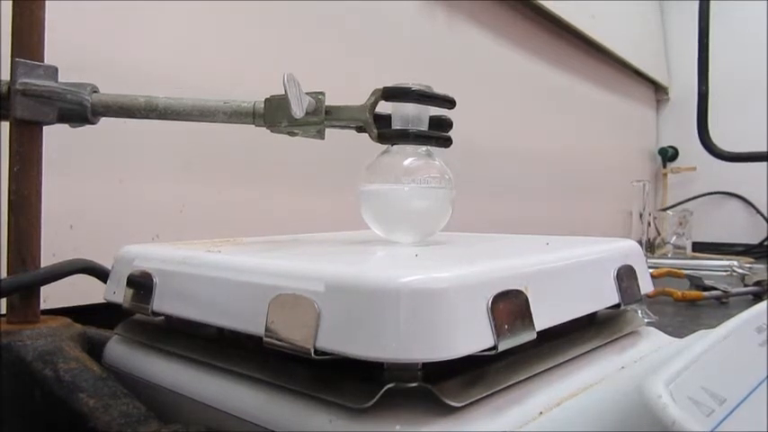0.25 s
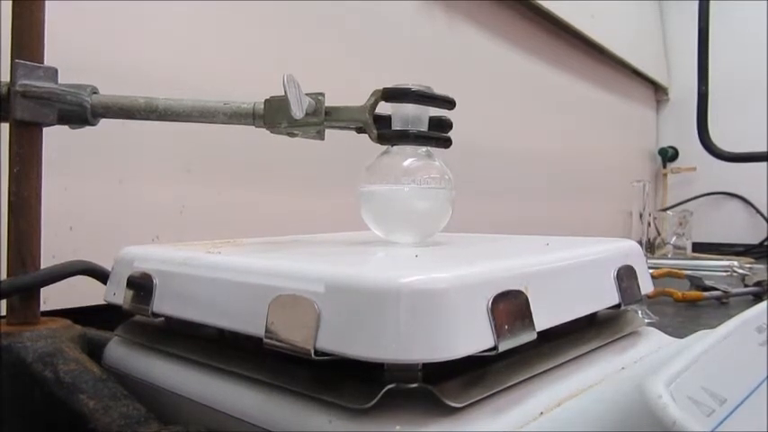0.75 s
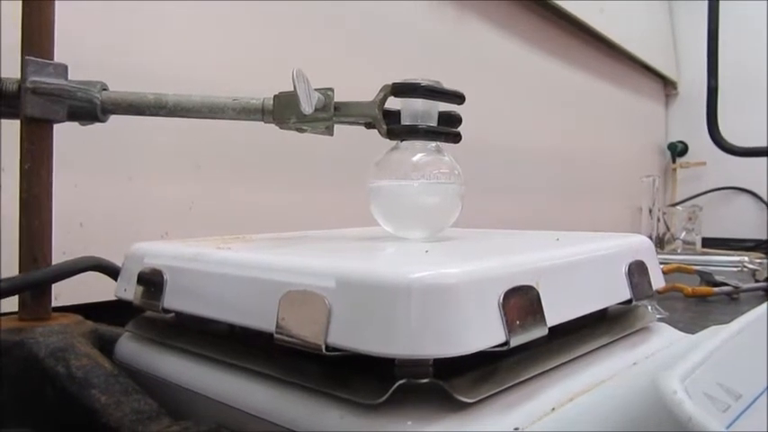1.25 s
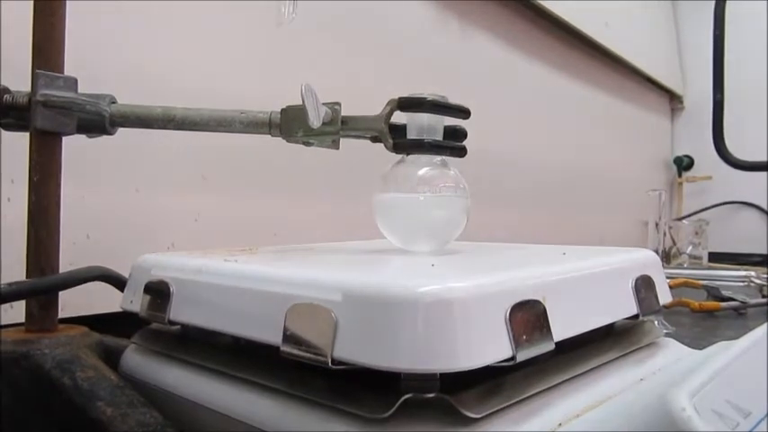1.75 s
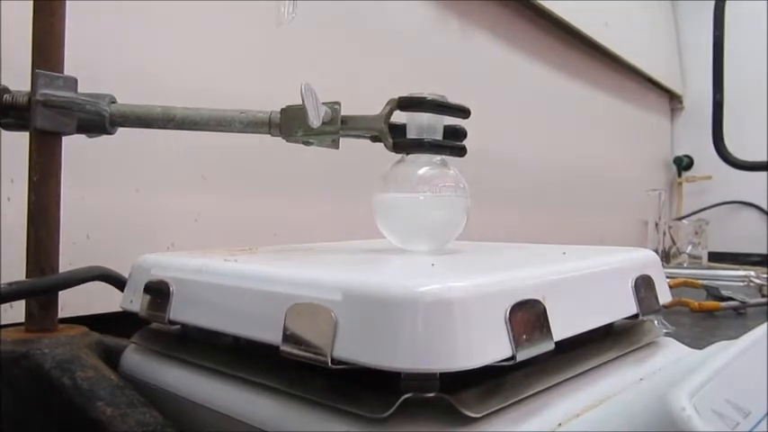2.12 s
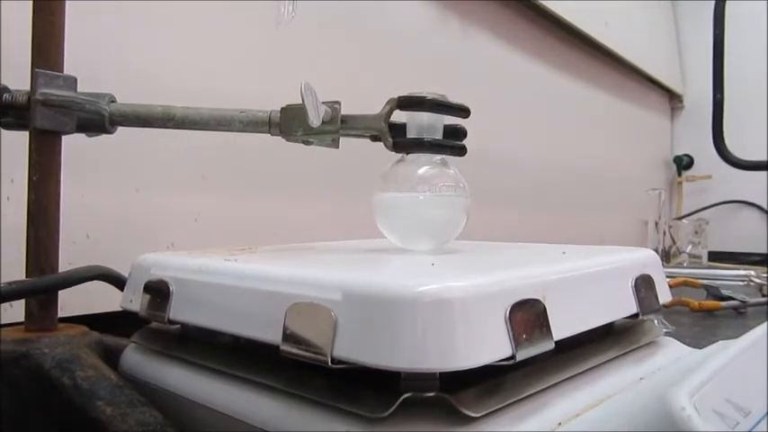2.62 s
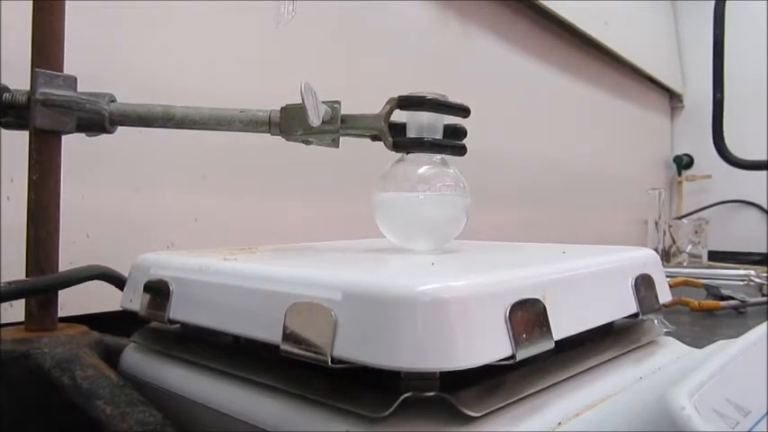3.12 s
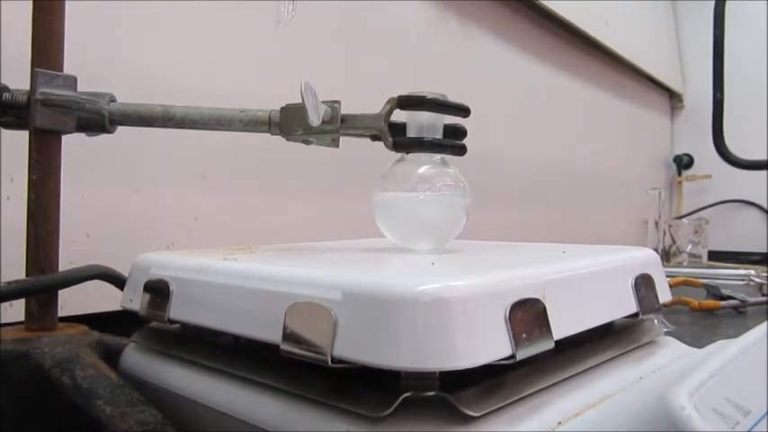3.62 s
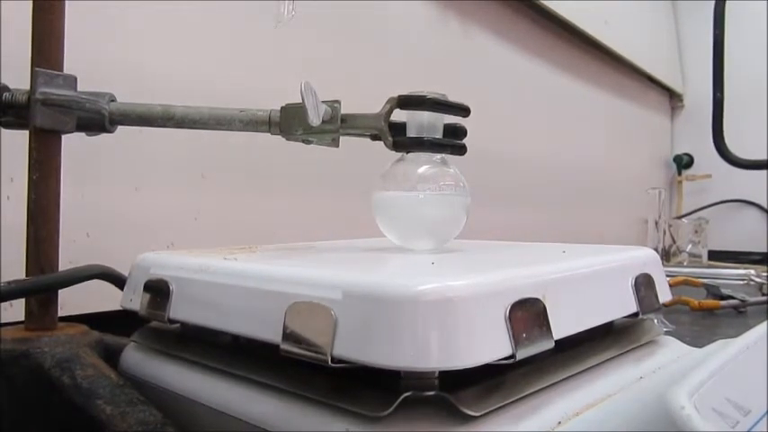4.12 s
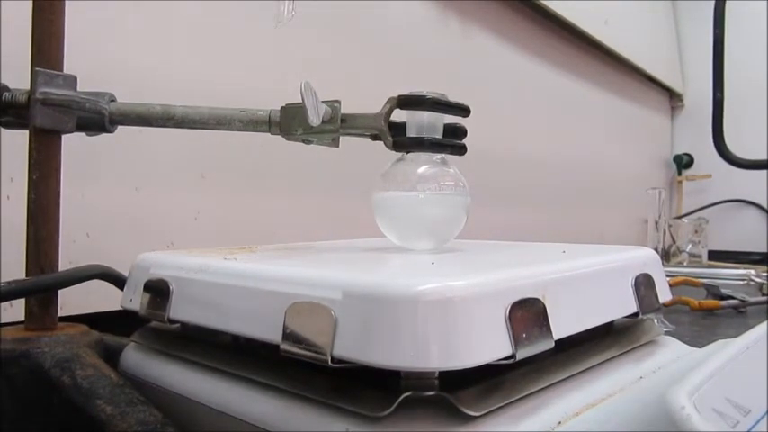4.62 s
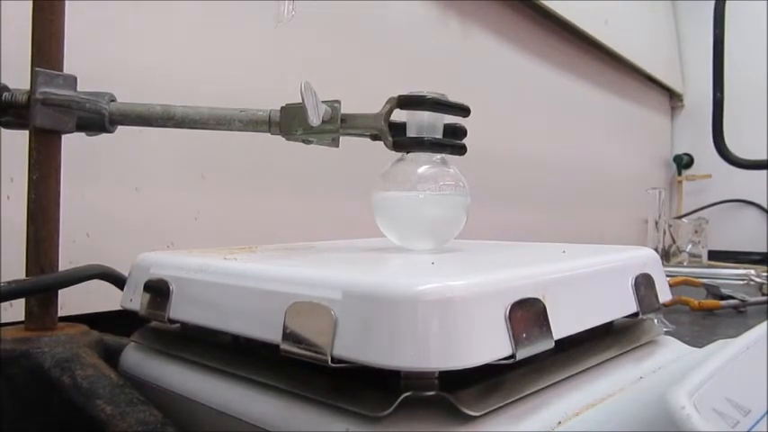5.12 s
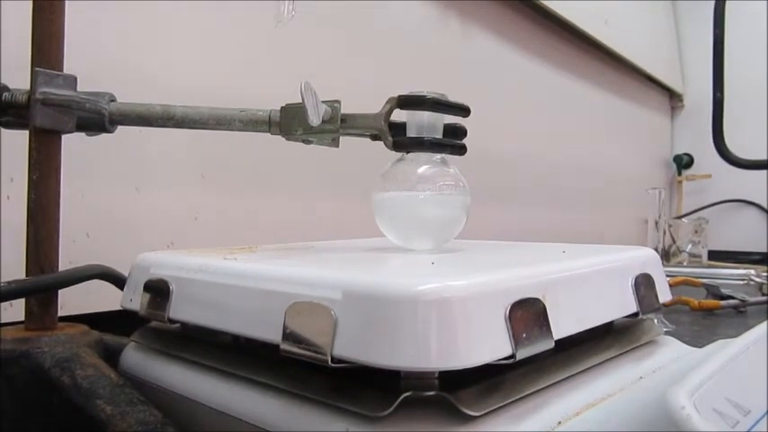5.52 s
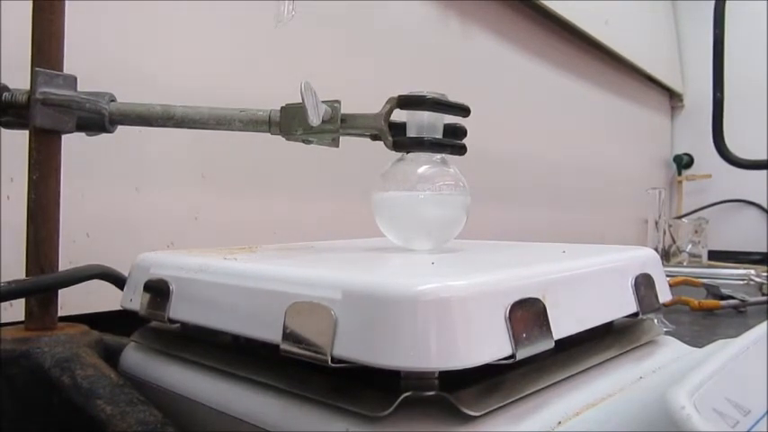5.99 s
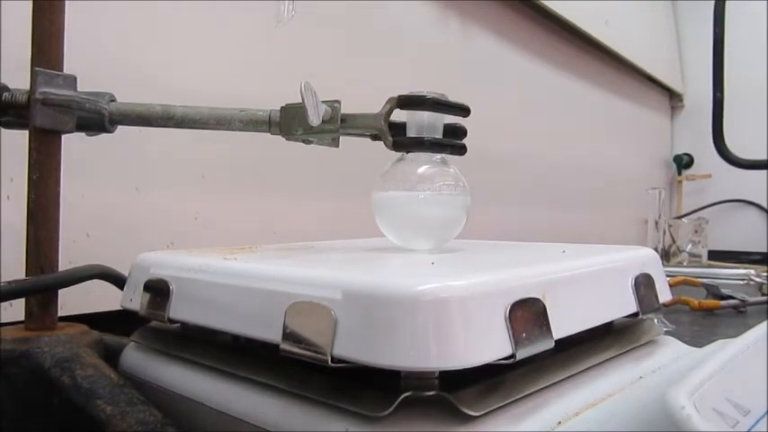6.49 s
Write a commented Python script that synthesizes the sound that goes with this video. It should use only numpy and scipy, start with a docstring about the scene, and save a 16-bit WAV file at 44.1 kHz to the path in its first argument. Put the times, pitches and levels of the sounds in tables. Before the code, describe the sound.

Ventilation runs steadily in a chemistry lab, heard close up from one microphone inside a fume hood. A deep throbbing hum and a low two-note drone sit under a hollow rush and hiss of air, with thin fan tones showing through. Early on there is one faint, bright tick, and the sound cuts abruptly to silence for a moment. It returns a little softer, quickly recovers and carries on.

```python
"""Fume hood ventilation in a chemistry lab, close up, with one microphone inside the hood.
Turbulent air rings the duct and the hood's cavity: a deep throbbing hum, a two-note drone, a boom,
a hollow rush and a hiss. Thin fan tones show through, over a low rumble, and there is one faint tick.
The sound cuts to silence for a moment, then comes back a little softer and recovers."""
import sys
import numpy as np
from scipy import signal
from scipy.fft import rfft, irfft
from scipy.io import wavfile
from scipy.ndimage import uniform_filter1d

SR = 44100
rng = np.random.default_rng(int(sys.argv[2]) if len(sys.argv) > 2 else 0)


def store_pcm(level_fs):
    """Save levels as 16-bit WAV."""
    pcm = np.round(np.clip(level_fs, -1, 1) * 32767).astype(np.int16)
    wavfile.write(sys.argv[1], SR, np.atleast_2d(pcm).T)


N = 297675
# where each band of the moving air ends and the next begins
RUMBLE_TOP_HZ, HUM_TOP_HZ, DRONE_SPLIT_HZ, DRONE_TOP_HZ = 48, 95, 151, 210
BOOM_TOP_HZ, LOW_RUSH_TOP_HZ, MID_RUSH_TOP_HZ = 360, 520, 730


# spectrum of the air stream before any resonance: frequency_hz, relative_db
STREAM_SPECTRUM = [(15, -4), (27, -4.5), (36, 9.5), (205, -9.5), (520, -3.5), (1240, -7), (1650, -6.5),
                   (2250, -13), (3100, -16.5), (5100, -18), (5600, -22.5), (6700, -24.5), (7800, -24),
                   (9600, -33), (15000, -43)]
# resonances of duct and hood: pitch_hz, width_hz, lift_db
RESONANCES = [(61.9, 8.4, 18), (106, 20.5, 12.5), (132, 43, 18), (142.1, 7.4, 17), (164.3, 31, 12),
              (180.9, 24, 20), (226.5, 18.6, 14.5), (248.4, 53, 9), (291.4, 29, 9), (322, 17, 10),
              (344, 31, 8), (378, 10, 6), (404.6, 26, 9), (451, 19, 7), (563.8, 26, 8.5), (592, 52, 7.5),
              (645, 17.5, 8.5), (676, 42, 5), (763.4, 52, 5), (884, 20, 5.5), (924, 33, 4.5),
              (987, 56, 4.5), (1043, 29, 6), (1124, 50, 5.5), (1340, 22, 6.5), (1380, 50, 2),
              (1492, 32, 4.5), (1563, 21, 2), (1641, 73, 2.5), (1773, 36, 2), (1942, 24, 6.5),
              (2000, 67, -1.5), (2097, 46, 5.5), (2400, 34, 0)]
# hollows where reflections off the walls cancel at the microphone: centre_hz, width_hz, gain_db
WALL_HOLLOWS = [(211, 18, -6.5), (278.5, 10, -6.5), (357, 15, -3.5), (465, 8.8, -11), (523, 6.9, -11.5),
                (535, 10.4, -7), (784, 23, -5), (945, 8, -5), (1085, 22, 0), (1190, 14, -8),
                (1250, 29, -4.5), (1785, 45, -0.5), (2253, 63, -2)]

def hood_colour(hz):
    """Spectrum inside the hood: the stream, lifted by resonances and hollowed by reflections."""
    points_hz, points_db = np.transpose(STREAM_SPECTRUM)
    stream = gain_of(np.interp(np.log(hz + 1), np.log(points_hz), points_db))
    lift = sum((gain_of(db) / (1 + (2 * (hz - centre) / width) ** 2)) ** 2
               for centre, width, db in RESONANCES)
    hollow_db = sum(db * np.exp(-(2 * (hz - centre) / width) ** 2) for centre, width, db in WALL_HOLLOWS)
    return stream * np.sqrt(1 + lift) * gain_of(hollow_db)


def airflow(low_hz, high_hz, ripple_db=0, crowded_hz=1500):
    """One band of turbulence through the hood; small modes crowd upwards and can ripple its spectrum."""
    hz = np.fft.rfftfreq(N, 1 / SR)
    band = (hz >= low_hz) & (hz < high_hz)
    ripple = gain_of(ripple_db * np.minimum(hz / crowded_hz, 1) * wander(len(hz), size=70))
    turbulence = rfft(rng.standard_normal(N))
    return unit_rms(irfft(turbulence * band * hood_colour(hz) * ripple, N))


# slow level of the hum between throbs: time_s, relative_db
HUM_LEVEL = [(0, -33), (0.72, -35), (0.84, -38), (0.98, -31.5), (1.7, -32), (2.95, -32.5), (3.22, -39),
             (3.4, -31.5), (4.5, -34), (4.59, -46), (4.8, -32.5), (5.78, -36.5), (5.9, -46), (6.02, -31),
             (6.25, -36), (6.55, -29.5), (6.75, -34)]
# its strongest throbs: peak_s, length_s, lift_db
HUM_THROBS = [(0.068, 0.06, 4), (0.63, 0.1, 6), (1.11, 0.098, 8.5), (1.332, 0.14, 8), (1.81, 0.063, 9.5),
              (1.923, 0.08, 7), (2.4, 0.11, 8), (2.88, 0.16, 2), (3.37, 0.074, 3), (3.80, 0.23, 4),
              (4.16, 0.08, 5), (4.473, 0.12, 6), (4.842, 0.16, 3), (5.263, 0.079, 6.5), (5.474, 0.096, 9),
              (5.76, 0.11, 9), (6.365, 0.088, 6.5)]

def hum(gain_db=1.84, unsteady_db=1.0, pitch_hz=62.5, drift_hz=3.47, core_db=-4):
    """The lowest duct resonance: a wavering tone in narrow noise, swelling and firming up in throbs."""
    throbs_db = sum(db * throb(at, length) for at, length, db in HUM_THROBS)
    swell_db = curve(HUM_LEVEL) + throbs_db + unsteady_db * wander(N, size=2000)
    core = gain_of(core_db + throbs_db) * tone(pitch_hz, drift_hz, size=5000)
    air = airflow(RUMBLE_TOP_HZ, HUM_TOP_HZ) + core
    return gain_of(gain_db) * surging(air, swell_db, size=3500)


# slow levels of the drone's two notes between throbs: time_s, level_db
LOWER_NOTE_LEVEL = [(0, -36), (0.3, -30.5), (0.85, -30.5), (1.22, -30.5), (1.37, -37.5), (1.8, -30.5),
                    (2.1, -33.5), (2.35, -30), (2.8, -29.5), (3.25, -37.5), (3.45, -32), (3.8, -33.5),
                    (4.65, -28), (4.85, -36), (5.1, -32), (6.75, -33)]
UPPER_NOTE_LEVEL = [(0, -33), (0.42, -34), (0.6, -29), (1.37, -34), (2.1, -31.5), (2.7, -28.5), (3.22, -35),
                    (3.55, -30), (3.9, -29.5), (4.5, -34.5), (5.4, -33), (5.8, -31.5), (6.4, -32),
                    (6.75, -30)]
# their strongest throbs: peak_s, length_s, lower_lift_db, upper_lift_db
NOTE_THROBS = [(0.121, 0.13, 7, 7), (0.271, 0.073, 4, 7), (0.397, 0.063, 5, 0), (1.04, 0.065, 5.5, 4.5),
               (2.227, 0.057, 6, 5), (2.456, 0.053, 3, 0.5), (2.64, 0.13, 1.5, 2.5), (2.952, 0.06, 3, 3.5),
               (3.574, 0.20, 9, -1.5), (3.728, 0.083, 3, 4.5), (4.038, 0.10, 0, 2.5),
               (4.763, 0.066, -2.5, 8), (6.598, 0.099, -1, 5.5)]

def drone(lower_hz=129.9, upper_hz=166.9):
    """The next two duct resonances; they swell apart, throb, and beat roughly against each other."""
    lower_db = curve(LOWER_NOTE_LEVEL) + sum(db * throb(at, length) for at, length, db, _ in NOTE_THROBS)
    upper_db = curve(UPPER_NOTE_LEVEL) + sum(db * throb(at, length) for at, length, _, db in NOTE_THROBS)
    lower = drone_note(HUM_TOP_HZ, DRONE_SPLIT_HZ, lower_hz, lower_db, core_db=-2.5)
    upper = drone_note(DRONE_SPLIT_HZ, DRONE_TOP_HZ, upper_hz, upper_db, core_db=-4.5)
    return lower + upper


def drone_note(low_hz, high_hz, pitch_hz, swell_db, core_db, drift_hz=2.185):
    """One duct resonance: narrow noise that firms up into a tone the more it swells."""
    core = gain_of(core_db + swell_db - swell_db.mean()) * tone(pitch_hz, drift_hz, size=7000)
    return surging(airflow(low_hz, high_hz) + core, swell_db, size=4800)


# slow levels of the rush's low, middle and high bands: time_s, level_db
LOW_RUSH_LEVEL = [(0, -37.5), (1.2, -37.5), (2, -39), (2.35, -36), (3.25, -39.5), (3.8, -36), (5, -35.5),
                  (6.75, -35.5)]
MID_RUSH_LEVEL = [(0, -35.5), (0.5, -31.8), (1.1, -33.8), (2, -33.5), (2.3, -31), (2.55, -35), (3, -32.7),
                  (3.3, -33.5), (4.8, -34), (5.6, -32.2), (6.75, -32)]
HIGH_RUSH_LEVEL = [(0, -28), (0.7, -28), (1.3, -28), (2, -27.5), (2.35, -27.5), (3.15, -28.5), (3.65, -28),
                   (4.4, -28), (5.2, -28), (6, -28.4), (6.75, -28)]

def rush(flutter_db=0.41):
    """Hollow rush and slightly fluttering hiss of air drawn through the hood, past the microphone."""
    low = surging(airflow(BOOM_TOP_HZ, LOW_RUSH_TOP_HZ), curve(LOW_RUSH_LEVEL), size=14000)
    middle = surging(airflow(LOW_RUSH_TOP_HZ, MID_RUSH_TOP_HZ), curve(MID_RUSH_LEVEL), size=12000)
    hiss = airflow(MID_RUSH_TOP_HZ, SR / 2, ripple_db=1.42)
    hiss_db = curve(HIGH_RUSH_LEVEL) + flutter_db * wander(N, size=2000)
    return low + middle + hiss * gain_of(hiss_db)


# slow level of the hood's boom: time_s, level_db
BOOM_LEVEL = [(0, -34), (0.5, -33.5), (0.72, -31.5), (0.9, -34.5), (1.8, -32.5), (2.45, -32.5),
              (2.58, -30.5), (2.77, -31.5), (2.88, -39), (3.04, -35.5), (3.15, -33), (4.4, -35), (5, -33),
              (6.75, -32.5)]

def boom():
    """The cavity around the microphone booms just above the drone's pitch and swells on its own."""
    return surging(airflow(DRONE_TOP_HZ, BOOM_TOP_HZ), curve(BOOM_LEVEL), size=9000)


# thin fan tones, half buried in the rush: pitch_hz, level_db
THIN_TONES = [(409.1, -46), (447, -49.5), (565.2, -46.3), (592, -49.5), (882.9, -46.5)]
# slow level of the highest fan tone, which swells once: time_s, level_db
WHINE_LEVEL = [(0, -46), (2.3, -45), (4.5, -47), (5.0, -46), (5.3, -41), (5.8, -46), (6.75, -45.5)]

def fans(whine_hz=1324, waver_db=2, drift_hz=0.7):
    """Faint whine of the fans; each tone drifts a little and wavers in the moving air."""
    whine = np.zeros(N)
    for hz, level_db in [*THIN_TONES, (whine_hz, curve(WHINE_LEVEL))]:
        wavering = tone(hz, drift_hz, size=4000) * gain_of(waver_db * wander(N, size=5000))
        whine += gain_of(level_db) * unit_rms(wavering)
    return whine


# slow level of the rumble: time_s, level_db
RUMBLE_LEVEL = [(0, -42), (0.5, -45), (2.5, -43.5), (4.4, -46), (4.75, -37.5), (5.1, -42.5), (6.75, -43)]

def rumble():
    """Faint shaking of the air, deeper than the hum."""
    return surging(airflow(0, RUMBLE_TOP_HZ), curve(RUMBLE_LEVEL), size=14000)


# modes the tick rings with: pitch_hz, level_db, t60_s
TICK_RING = [(4720, -37, 0.03), (5356, -42, 0.057), (7340, -42, 0.25)]

def tick(start_s=1.350, level_db=-33, band_hz=(3300, 7600), t60_s=0.045):
    """One faint, bright tick: a burst of noise with a brief glassy ring."""
    age = np.maximum(np.arange(N) / SR - start_s, 0)
    band = signal.butter(3, band_hz, "bandpass", fs=SR, output="sos")
    noise = unit_rms(signal.sosfilt(band, rng.standard_normal(N)))
    burst = noise * gain_of(level_db) * np.exp(-np.log(1000) * age / t60_s)
    ring = sum(gain_of(db) * np.sin(2 * np.pi * hz * age) * np.exp(-np.log(1000) * age / ring_s)
               for hz, db, ring_s in TICK_RING)
    return burst * (age > 0) + ring


def surging(band, level_db, size):
    """Keeps a band's quick beating, while its slow level (over about size samples) follows level_db."""
    slow_power = uniform_filter1d(uniform_filter1d(band ** 2, size), size)
    return unit_rms(band / np.sqrt(slow_power + 1e-9)) * gain_of(level_db)


def tone(hz, drift_hz, size):
    """A sine of rms 1 whose pitch drifts by chance over about size samples."""
    pitch_hz = hz + drift_hz * wander(N, size)
    return np.sqrt(2) * np.sin(2 * np.pi * np.cumsum(pitch_hz) / SR)


def throb(peak_s, length_s):
    """A smooth bump of height 1, one value a sample."""
    return np.exp(-(2 * (np.arange(N) / SR - peak_s) / length_s) ** 2)


def wander(length, size):
    """A smooth random curve of rms 1 that changes over about size steps."""
    return unit_rms(uniform_filter1d(uniform_filter1d(rng.standard_normal(length), size), size))


def curve(rows):
    """Joins rows of time_s, value by straight lines, one value a sample."""
    return np.interp(np.arange(N) / SR, *np.transpose(rows))


def gain_of(db):
    """Decibels to amplitude."""
    return 10 ** (np.asarray(db) / 20)


def unit_rms(x):
    """Scales to an rms of 1."""
    return x / np.sqrt(np.mean(x ** 2) + 1e-20)


def scene():
    """All the ventilation and the tick, at one microphone inside the hood."""
    return (rumble() + hum() + drone() + boom() + rush() + tick() + fans())[None]


def record(dry):
    """An abrupt silence, a slightly soft start and a softer return that both recover, and a treble cut."""
    cut_s, return_s = 1.380, 1.668
    start_db, return_db, recover_s = -0.5, -5.5, 0.31
    cutoff_hz = 15080
    t = np.arange(N) / SR
    gate = uniform_filter1d(1.0 * ((t < cut_s) | (t > return_s)), size=24)
    soft_db = start_db * np.exp(-t / recover_s)
    soft_db += return_db * (t > return_s) * np.exp(-abs(t - return_s) / recover_s)
    low_pass = signal.firwin(511, cutoff_hz, window=("kaiser", 9), fs=SR)
    return signal.oaconvolve(dry * gate * gain_of(soft_db), low_pass[None], "same")


dry = scene()
out = record(dry)
store_pcm(out)
```